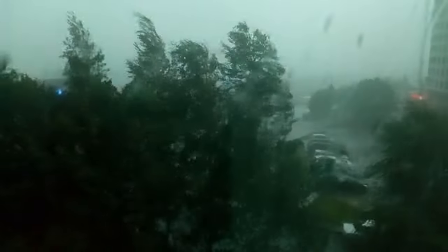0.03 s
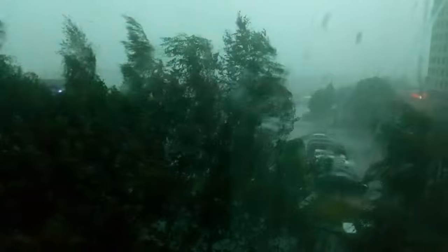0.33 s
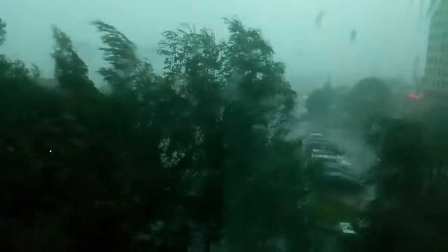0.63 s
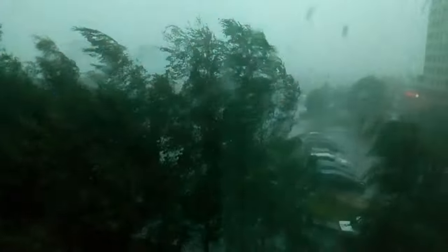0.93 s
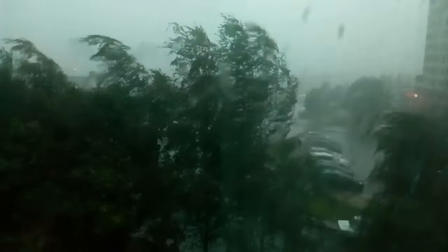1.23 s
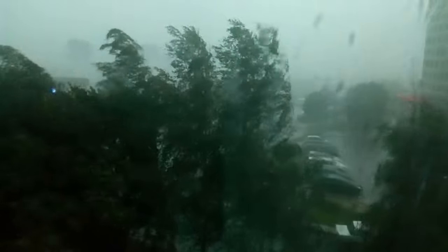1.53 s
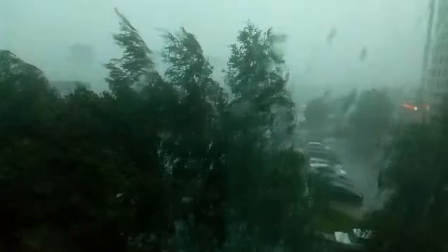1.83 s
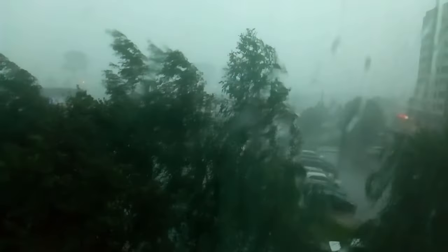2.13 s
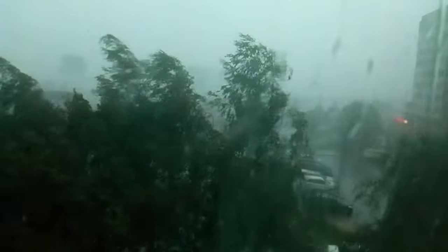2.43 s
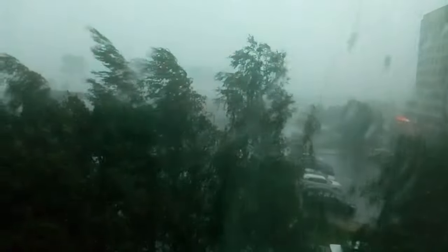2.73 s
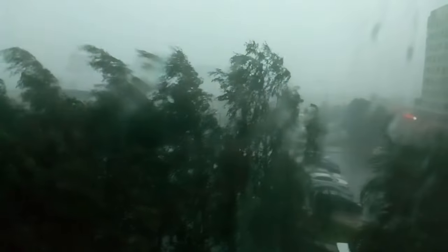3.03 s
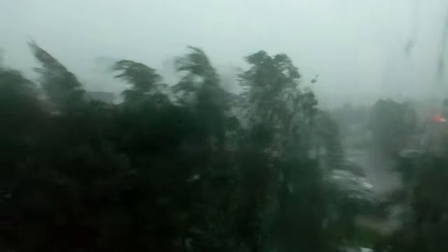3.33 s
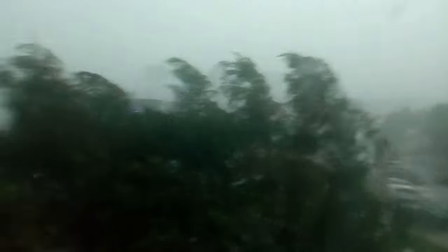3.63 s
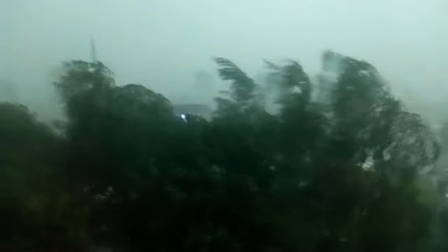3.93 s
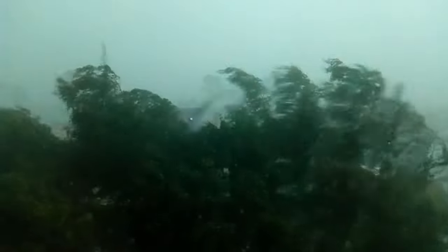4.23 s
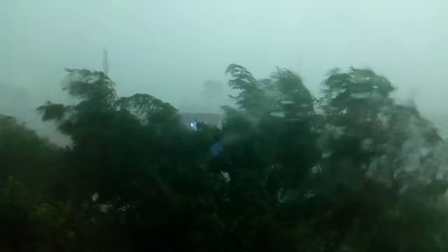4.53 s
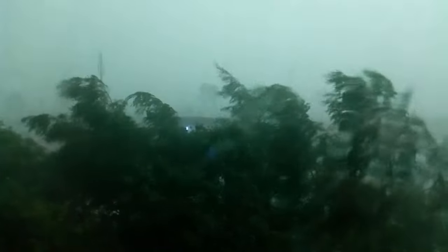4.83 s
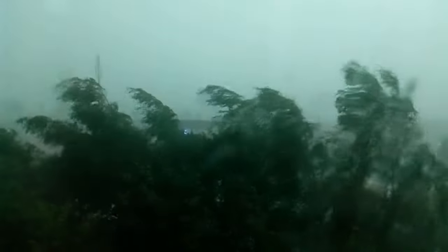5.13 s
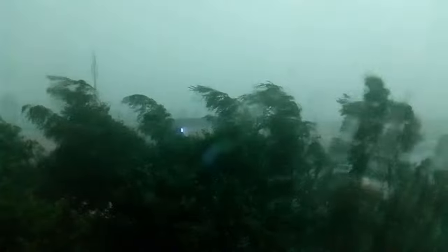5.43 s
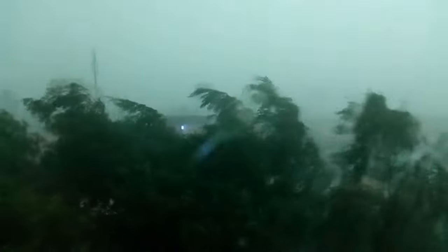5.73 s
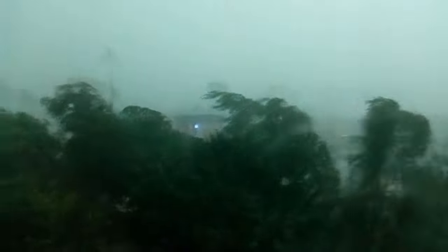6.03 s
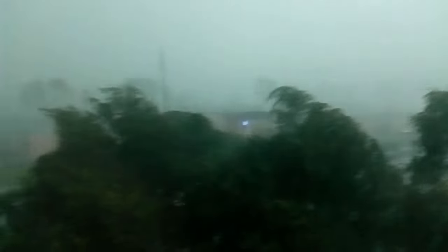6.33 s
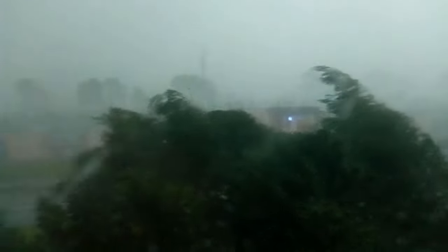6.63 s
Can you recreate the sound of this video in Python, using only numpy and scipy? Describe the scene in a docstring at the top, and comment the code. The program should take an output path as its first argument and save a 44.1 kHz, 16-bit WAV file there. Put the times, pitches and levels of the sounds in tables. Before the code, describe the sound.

Heavy rain drums on a closed window, with sharp splashes and fine spray hitting the glass hardest in the first half. The window gives one brief low judder, and faint drips ring on a metal sill. The patter then eases as gusts of wind boom and rumble, growing toward the end. Rain hisses in the trees outside throughout. The microphone is just behind the pane in a small upstairs room.

```python
"""A room a few floors up, just behind a closed window, in a rainstorm.
Sheets of rain and flung splashes drum on the pane, exciting its resonances and bursting into spray.
Fat drops knock, a few hard ones tick close by, and runs of drips ring the metal sill.
The window judders once by stick-slip friction. Turbulent wind booms in the low modes of window
and room and builds toward the end, while rain hisses in the trees outside."""
import sys
import numpy as np
from scipy import signal
from scipy.fft import rfft, irfft
from scipy.io import wavfile
from scipy.ndimage import uniform_filter1d

SR = 44100
rng = np.random.default_rng(int(sys.argv[2]) if len(sys.argv) > 2 else 0)


def master(y):
    """Save y as 16-bit WAV."""
    cut = np.clip(np.atleast_2d(y).T, -1, 1)
    pcm = np.round(cut * 32767)  # scale
    wavfile.write(sys.argv[1], SR, pcm.astype(np.int16))


N = 302967
T = np.arange(N) / SR
HZ = np.maximum(np.arange(N // 2 + 1) * SR / N, 1)

# Rain driven against the pane. Each row: time in seconds, level in dB.
RAIN_DRIVE = [(0, -22), (0.2, -25), (0.3, -27), (0.82, -27.5), (1.05, -27), (1.36, -30.5), (1.42, -33),
              (2.1, -34), (2.28, -35.5), (2.52, -31.5), (2.63, -28), (2.93, -28), (3.08, -35), (3.3, -33),
              (3.55, -40.5), (3.8, -36), (4.45, -36), (4.75, -39), (5.1, -37.5), (5.85, -39), (6.2, -39.5),
              (6.87, -35.5)]
# Water flung at the pane. Each row: start in seconds, peak in dB, rise in seconds,
# spray relative to the peak in dB, ring frequency in Hz.
FLUNG_SPLASHES = [(0.0, -31.5, 0.022, -7, 1950), (0.147, -26.5, 0.025, -12, 1930),
                  (0.308, -40, 0.0081, 2.5, 2330), (0.616, -29, 0.013, -5, 1800),
                  (0.688, -30, 0.007, -6, 1930), (0.708, -24.5, 0.011, -12.5, 1930),
                  (1.015, -27.5, 0.022, -11.5, 1580), (1.114, -29, 0.028, -11.5, 1940),
                  (1.232, -27, 0.02, -15.5, 1980), (1.3, -28, 0.017, -23, 2420),
                  (1.435, -24.5, 0.021, -20, 1600), (1.536, -29, 0.029, -16.5, 1880),
                  (1.626, -30.5, 0.014, -16, 1660), (1.79, -31.5, 0.03, -25, 1550),
                  (1.868, -29.5, 0.013, -20, 1600), (1.932, -27, 0.014, -14.5, 2350),
                  (2.085, -37, 0.022, -30, 1540), (2.175, -34, 0.018, -18, 1570),
                  (2.374, -30, 0.027, -11.5, 1780), (2.552, -26, 0.019, -11, 1540),
                  (2.599, -28, 0.012, -18, 1540), (2.733, -29.5, 0.016, -21, 1750),
                  (2.8, -32.5, 0.018, -22, 1700), (2.865, -31.5, 0.038, -28, 2100),
                  (3.155, -28, 0.027, -19, 1580), (3.645, -45, 0.019, -25, 1700),
                  (3.705, -37, 0.019, -28, 1930), (4.022, -32.5, 0.039, -20, 1770),
                  (4.185, -31.5, 0.023, -15, 1770), (4.26, -36.5, 0.023, -19, 1530),
                  (4.499, -28, 0.025, -20.5, 1590), (4.926, -28, 0.022, -18, 1850),
                  (5.005, -34.5, 0.0084, -22, 1810), (5.108, -37, 0.012, -22, 1900),
                  (5.215, -37.5, 0.016, -10, 1600), (5.243, -34, 0.012, -18, 1510),
                  (5.331, -32.5, 0.023, -20, 1500), (5.478, -31.5, 0.015, -15, 1960),
                  (5.616, -27, 0.011, -17, 1690), (5.659, -33.5, 0.022, -14, 1600),
                  (5.735, -32, 0.013, -15, 1880), (5.959, -33.5, 0.019, -22, 1690),
                  (6.625, -37.5, 0.025, -19, 1600)]
# The pane's broad response. Each row: frequency in Hz, left gain in dB, right gain in dB.
PANE_RESPONSE = [(143, 0.5, 1.5), (393, -12, -13.5), (726, -9, -8), (1165, -4, -2), (1415, -2, 2),
                 (1930, -5, 3.5), (2130, -4, 2.5), (2460, -11.5, 1), (2790, -7.5, 0.5), (3490, -30, -9.5),
                 (4160, -14.5, -11.5), (4580, -22, -14), (6270, -22, -19), (8950, -69, -68)]
# The pane's narrow resonances. Each row: frequency in Hz, half-width in Hz, gain in dB.
GLASS_MODES = [(377, 7.7, 4.5), (538, 46, -8.5), (886, 39, -6.5), (1492, 24, -11.5), (1596, 31, -3.5),
               (1780, 20, -8), (1934, 23, -5.5), (2366, 48, -5.5), (2510, 66, -14.5), (3810, 110, -10)]
# Fine spray on the glass. Each row: frequency in Hz, gain in dB.
SPRAY_SPECTRUM = [(1500, -47), (3000, 4), (3400, 14), (3900, 14.5), (5000, 10.5), (6500, 7.5), (7400, 3.5),
                  (8300, -5.5), (10000, -10.5), (12800, -18), (15000, -27)]
# Fat drops. Each row: start in seconds, level in dB, ring frequency in Hz, decay in seconds.
DROP_KNOCKS = [(1.826, -28, 1600, 0.009), (1.872, -26, 1640, 0.0094), (2.565, -22, 1610, 0.004),
               (2.5745, -23, 1570, 0.0056), (4.921, -26.5, 1870, 0.0068), (5.621, -25, 1780, 0.006)]
# Lone hard drops. Each row: start in seconds, level in dB, decay in seconds, left minus right in dB.
DROP_TICKS = [(.198, -23.5, .004, 0), (2.563, -32, .022, -1), (3.487, -41, .002, 0), (5.485, -41, .022, 0),
              (5.621, -38, .016, -1), (6.7866, -24, .0004, 4)]
# Runs of drips on the sill. Each row: start in seconds, length in seconds, level in dB.
SILL_RUNS = [(1.805, 0.13, -48), (3.95, 0.22, -43.5), (4.22, 0.091, -47), (4.408, 0.185, -41.5),
             (6.642, 0.2, -48)]
# The sill's resonances. Each row: frequency in Hz, half-width in Hz, level in dB.
SILL_MODES = [(1488, 14, -9), (1608, 9, 0), (1755, 14, -10)]
# Shudders of the sash. Each row: start in seconds, length in seconds, pitch in Hz, level in dB.
SASH_SHUDDERS = [(2.471, 0.13, 104.5, -24), (2.564, 0.064, 127.3, -24), (2.634, 0.032, 145, -27)]
# The wind's steady push. Each row: time in seconds, rumble in dB, rush in dB.
STEADY_WIND = [(0, -42, -51.5), (4.85, -40, -46.5), (5.0, -35.5, -45), (5.25, -37, -40), (5.4, -30, -35),
               (6.0, -31, -37), (6.55, -34, -33), (6.87, -30, -35)]
# Gusts on top of it. Each row: start, rise and hold in seconds, rumble in dB, rush in dB.
WIND_GUSTS = [(4.907, 0.042, 0.017, -30, -36), (5.0, 0.034, 0.07, -38, -37.5),
              (5.267, 0.077, 0.012, -27.5, -38), (5.42, 0.033, 0.089, -31, -32.5),
              (5.64, 0.037, 0.11, -31, -34.5), (6.039, 0.026, 0.05, -28, -39),
              (6.239, 0.055, 0.04, -26.5, -33), (6.409, 0.037, 0.017, -21.5, -38),
              (6.697, 0.056, 0.047, -23.5, -29), (6.8, 0.025, 0.03, -27, -40)]
# Low modes of window and room. Each row: frequency in Hz, half-width in Hz,
# gain in a mild wind in dB, gain in a strong wind in dB.
LOW_MODES = [(20, 4.2, -25, -18), (79.3, 7.2, -7, -26), (121, 16, -6, -24), (141.2, 8.5, 3.5, -7),
             (177, 14, -10, 0.5), (230, 24.6, -2.5, -16), (313, 7.6, -21, -17), (378.4, 9.2, -15, -15),
             (504, 12, -24, -16.5)]
# Wind rushing past the wall. Each row: frequency in Hz, gain in dB.
RUSH_SPECTRUM = [(40, -36), (120, -2.5), (235, 0), (300, 1), (420, -1.5), (510, -1.5), (600, -7),
                 (800, -13.5), (1200, -21.5), (4000, -70)]
# Rain in the trees and on the street. Each row: frequency in Hz, gain in dB.
TREE_SPECTRUM = [(100, 0), (500, 9.5), (900, 7), (1500, -5.5), (3000, 1), (5000, -1.5), (6500, -3),
                 (7400, -12.5), (8100, -23.5), (11000, -37), (15000, -61)]
# How hard the trees are tossed. Each row: time in seconds, level in dB.
TREE_TOSS = [(0, -44), (1.1, -42.5), (1.9, -41), (2.3, -43), (3.2, -41), (3.6, -43.5), (4.3, -42.5),
             (4.8, -44.5), (5.15, -44), (5.45, -41.5), (6.0, -42), (6.87, -39.5)]


def rain_on_pane(drops_per_s=5000, clumps_per_s=90, clump_share=0.18, spray_db=-12, spray_growth=1.56,
                 pane_db=-3.5, pane_low_hz=113, knock_db=-6, solid_db=-20, body_db=-5):
    """Impact excitation: drops ring the pane and burst into spray, more so in hard rain."""
    rain_db, = curves(RAIN_DRIVE)
    # part of the rain lands in clumps that start at once and trail off
    clumps = fade(impacts(clumps_per_s, spread_db=2.5), decay=0.0092)
    flutter = 1 + clump_share * (clumps / clumps.mean() - 1)
    pane = spectrum(PANE_RESPONSE) / (1 + (pane_low_hz / HZ) ** 4)
    bright = glass(shaped(diffuse_noise(alike_hz=1470), pane))
    body = undb(body_db) * shaped(diffuse_noise(alike_hz=740), pane * peak(hz=650, width=300))
    water_power = undb(rain_db) ** 2
    spray_power = undb(spray_db + rain_db.max() + spray_growth * (rain_db - rain_db.max())) ** 2
    knocks = np.zeros((2, N))
    for start, db, rise, fine_db, ring_hz in FLUNG_SPLASHES:
        span = slice(int(start * SR), int(start * SR) + SR // 2)
        age = np.maximum(T[span] - start, 0) / rise
        splash = undb(db) * age * np.exp(1 - age)
        water_power[span] += splash ** 2
        spray_power[span] += (splash * undb(fine_db)) ** 2
        # water landing in one piece sprays little and knocks instead; the spot it hits sets the ring
        solid = 1 / np.hypot(1, undb(fine_db - solid_db))
        spot_ring = unit(resonate(bright[:, span], ring_hz, width=170))
        knocks[:, span] += splash * solid * (spot_ring + body[:, span])
    # more water means both more drops and harder ones
    rate = drops_per_s * np.sqrt(water_power / water_power.mean())
    patches = np.array([drops(rate) for _ in range(3)])
    patter = stereo_field(rfft(patches * np.sqrt(flutter / rate)), alike_hz=764, direct=0.5)
    ring = undb(pane_db) * np.sqrt(water_power) * glass(shaped(patter, pane))
    spray = np.sqrt(spray_power) * shaped(patter, spectrum(SPRAY_SPECTRUM))
    return ring + undb(knock_db) * knocks + spray


def drops(rate, decay_s=0.0029, scatter_db=5.5):
    """Scattering: each drop clicks, then its energy dies away in the window recess."""
    hits = impacts(rate, spread_db=3.5)
    scattered = undb(scatter_db) * np.sqrt(fade(hits ** 2, decay_s))
    return (hits + scattered) * rng.standard_normal(N)


def glass(x, shift_db=3, shifts_per_s=7):
    """Modal response: each narrow ring swells and fades as water strikes different spots."""
    rings = sum(undb(db + shift_db * walk(shifts_per_s)) * resonate(x, hz, width)
                for hz, width, db in GLASS_MODES)
    return unit(x + rings)


def fat_drops(contact_s=0.0014, smear_db=-8):
    """Damped vibration: a fat drop pushes the glass, which rings briefly as the water smears."""
    smear = undb(smear_db) * shaped(diffuse_noise(alike_hz=1470), spectrum(PANE_RESPONSE))
    out = 0
    for start, db, hz, decay in DROP_KNOCKS:
        age = np.maximum(T - start, 0)
        envelope = undb(db) * (1 - np.exp(-age / contact_s)) * np.exp(-age / decay)
        out += envelope * (np.sin(2 * np.pi * hz * age) + smear)
    return out * pan(-3)


def hard_drops(soft_hz=16000, crack_db=9, shatter_s=0.003):
    """Brief impacts are broadband: a drop cracks if it stays whole and fizzes if it shatters."""
    noise = shaped(diffuse_noise(alike_hz=2500), 1)
    force = 0
    for start, db, decay, pan_db in DROP_TICKS:
        crack = undb(crack_db) / (1 + decay / shatter_s) * (np.arange(N) == int(start * SR))
        fizz = noise * (T >= start) * np.exp(-np.abs(T - start) / decay)
        force += (crack + fizz) * undb(db) * pan(pan_db)
    colour = unit(spectrum(SPRAY_SPECTRUM) * peak(0, soft_hz))
    return irfft(rfft(force) * colour, N)


def sill(drips_per_s=400, edge_s=0.013, soft_width_hz=300):
    """Resonance: spells of drips off the frame keep the metal sill ringing, chiefly on one note."""
    flow = sum(undb(db) * np.clip(np.minimum(T - start, start + length - T) / edge_s, 0, 1)
               for start, length, db in SILL_RUNS)
    drips = impacts(drips_per_s, spread_db=0) * rng.standard_normal(size=(2, N))
    ring = sum(undb(db) * unit(resonate(resonate(drips, hz, soft_width_hz), hz, width))
               for hz, width, db in SILL_MODES)
    return even(ring + 1e-6, span_s=0.04) * flow * pan(-4)


def judder(overtone_db=-27, rough_db=2, jitter=0.011, thud_db=-14, thud_hz=140):
    """Stick-slip friction: the sash groans in its frame over a dull thud, higher at each shudder."""
    thud_colour = peak(thud_hz, width=130) * HZ / (HZ + thud_hz)
    thud = undb(thud_db) * shaped(diffuse_noise(alike_hz=500), thud_colour)
    wavering_time = np.cumsum(1 + jitter * walk(rate=90)) / SR
    roughness = undb(rough_db * walk(rate=88))
    out = 0
    for start, length, hz, db in SASH_SHUDDERS:
        phase = 2 * np.pi * hz * wavering_time
        groan = unit(np.sin(phase) + undb(overtone_db) * np.sin(2 * phase))
        swell = np.sin(np.pi * np.clip((T - start) / length, 0, 1))
        out += undb(db) * swell * (groan * roughness + thud)
    return out


def wind(boom_db=-3, boom_yield_db=-8, buffet_db=-0.44, strong_wind_db=-33, eddy_s=0.1):
    """Forced vibration: eddies rush past the wall and shake the low modes; strong wind favours a few."""
    rumble_db, rush_db = wind_levels()
    strength = undb(rumble_db) / (undb(rumble_db) + undb(strong_wind_db))
    buffet = undb(buffet_db * strength * walk(rate=26))
    mild = np.sqrt(sum((undb(db) * peak(hz, width)) ** 2 for hz, width, db, _ in LOW_MODES))
    strong = np.sqrt(sum((undb(db) * peak(hz, width)) ** 2 for hz, width, _, db in LOW_MODES))
    boom = even(shaped(diffuse_noise(alike_hz=520), mild), eddy_s)
    boom *= undb(rumble_db + boom_db + boom_yield_db * strength) * pan(-1.4)
    drone = even(shaped(diffuse_noise(alike_hz=450), strong), eddy_s)
    drone *= strength * undb(rumble_db) * pan(-2.6)
    rush = shaped(diffuse_noise(alike_hz=650), spectrum(RUSH_SPECTRUM)) * undb(rush_db) * pan(1)
    return (boom + drone + rush) * buffet


def wind_levels(release_s=0.076):
    """Incoherent sources add in power: steady wind plus gusts give the rumble and rush in dB."""
    power = undb(curves(STEADY_WIND)) ** 2
    for start, rise, hold, rumble_db, rush_db in WIND_GUSTS:
        attack = np.clip((T - start) / rise, 0, 1)
        release = np.exp(-np.maximum(T - start - rise - hold, 0) / release_s)
        power += (undb([[rumble_db], [rush_db]]) * attack * release) ** 2
    return 10 * np.log10(power)


def trees(sway_db=0.2):
    """Superposition: leaves and far rain merge into a hiss that lifts as the crowns are tossed."""
    toss_db, = curves(TREE_TOSS)
    hiss = shaped(diffuse_noise(alike_hz=694), spectrum(TREE_SPECTRUM))
    return hiss * undb(toss_db + sway_db * walk(rate=4))


def room(x, t60_s=0.33, wet_db=-10):
    """Reverberation: the small room adds a short tail, different on the left and right."""
    t = T[:SR // 4]
    tail = rng.standard_normal(size=(2, len(t))) * undb(-60 * t / t60_s) * (t > .003)
    tail *= undb(wet_db) / np.linalg.norm(tail, axis=1, keepdims=True)
    tail = signal.sosfilt(signal.butter(2, 300, "high", fs=SR, output="sos"), tail)
    return x + signal.fftconvolve(x, tail, axes=1)[:, :N]


def stereo_field(fields, alike_hz, direct, right_lag_s=0.00029):
    """Spatial coherence: a diffuse field is alike in the bass; direct sound reaches the left first."""
    mid, side, near = fields
    coherence = .99 / (1 + (HZ / alike_hz) ** 4)
    opposed = side * np.array([[1], [-1]])
    diffuse = (mid * np.sqrt(1 + coherence) + opposed * np.sqrt(1 - coherence)) / np.sqrt(2)
    lag = np.exp(-2j * np.pi * HZ * np.array([[0], [right_lag_s]]))
    # the source is wide, so the common delay blurs away in the treble
    share = direct / (1 + (HZ / 3500) ** 2)
    return np.sqrt(1 - share) * diffuse + np.sqrt(share) * near * lag


def diffuse_noise(alike_hz):
    """Left and right spectra of white noise in a diffuse field."""
    real, imag = rng.standard_normal(size=(2, 3, len(HZ)))
    return stereo_field(real + 1j * imag, alike_hz, direct=0)


def impacts(rate, spread_db):
    """A Poisson process: impulses at random moments, with a few big among many small if spread."""
    occurs = rng.random(N) < rate / SR
    return occurs * undb(spread_db * np.minimum(rng.exponential(size=N), 3.5))


def fade(x, decay):
    """Exponential decay: every impulse gets a tail of the same area."""
    keep = np.exp(-1 / (decay * SR))
    return signal.lfilter([1 - keep], [1, -keep], x)


def resonate(x, hz, width):
    """A damped resonator, gain 1 at its centre; width is the half-width in Hz."""
    return signal.lfilter(*signal.iirpeak(hz, hz / (2 * width), fs=SR), x)


def peak(hz, width):
    """A resonance curve, 1 at the centre and a half at width Hz from it."""
    return 1 / (1 + ((HZ - hz) / width) ** 2)


def shaped(field, gain):
    """Filtering: a spectrum times a frequency response gives a waveform, scaled to rms 1."""
    return unit(irfft(field * gain, N))


def spectrum(table):
    """A frequency response for each dB column of a table."""
    hz, *columns = np.transpose(table)
    return undb([np.interp(np.log(HZ), np.log(hz), column) for column in columns])


def curves(table):
    """Each column of a time table, interpolated sample by sample."""
    times, *columns = np.transpose(table)
    return [np.interp(T, times, column) for column in columns]


def walk(rate):
    """Random fluctuation of rms 1: levels held 1 / rate seconds and smoothed twice."""
    hold = max(int(SR / rate), 2)
    steps = np.repeat(rng.standard_normal(N // hold + 1), hold)
    return unit(uniform_filter1d(uniform_filter1d(steps, hold), hold)[:N])


def even(x, span_s):
    """Hold a noise near rms 1, so that its swells come from what drives it."""
    local_power = uniform_filter1d(np.mean(x ** 2, axis=0), int(span_s * SR))
    return unit(x / np.sqrt(local_power))


def pan(db):
    """Two gains whose level difference, left minus right, is db."""
    return undb(db * np.array([[.5], [-.5]]))


def undb(db):
    """Decibels to gain."""
    return 10 ** (np.asarray(db) / 20)


def unit(x):
    """Scale to rms 1."""
    return x / np.sqrt(np.mean(x ** 2))


def scene():
    """Superposition: the sounds of the storm add and reverberate in the room."""
    return room(rain_on_pane() + fat_drops() + sill() + trees() + wind() + judder() + hard_drops())


def record(dry):
    """Band limiting: a steep low-pass cuts the top; brief fades open and close without a click."""
    top_hz, edge_s = 15000, 0.003
    edges = np.clip(np.minimum(T, T[-1] - T) / edge_s, 0, 1)
    return signal.sosfilt(signal.ellip(8, .2, 70, top_hz, fs=SR, output="sos"), dry * edges)


dry = scene()
out = record(dry)
master(out)
```